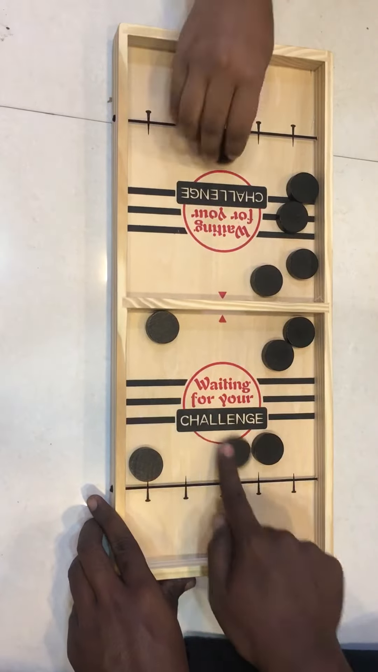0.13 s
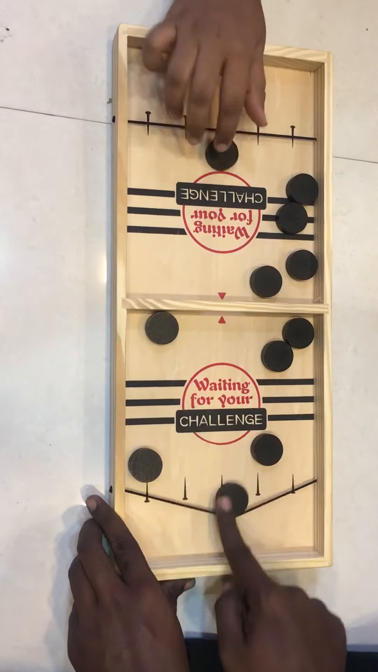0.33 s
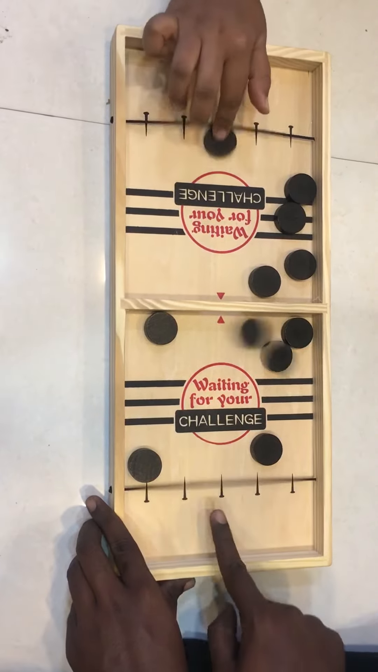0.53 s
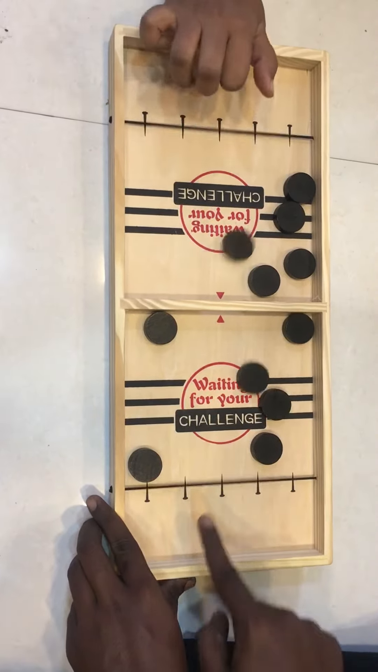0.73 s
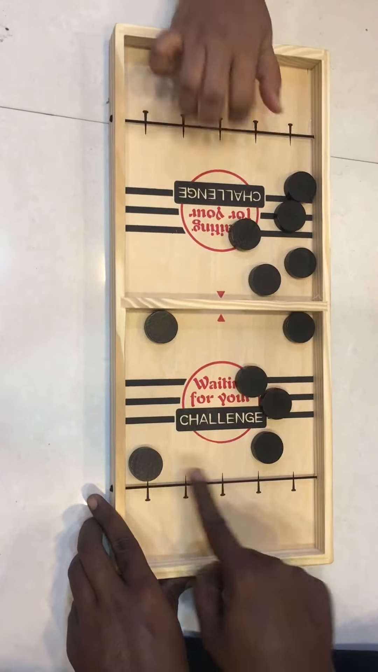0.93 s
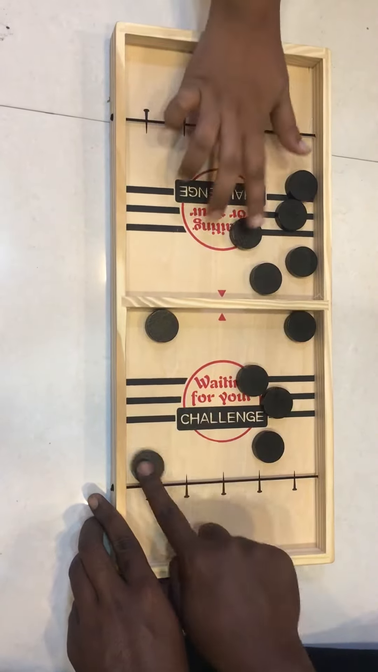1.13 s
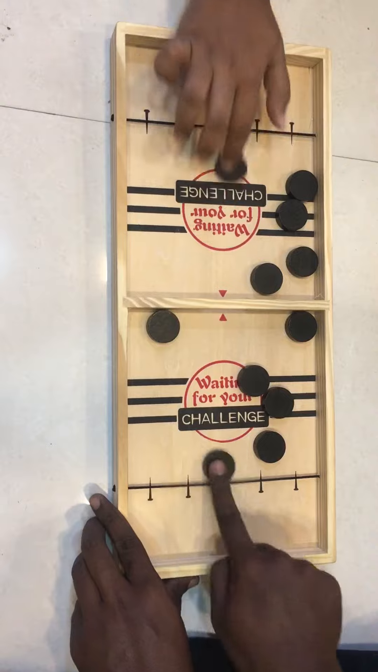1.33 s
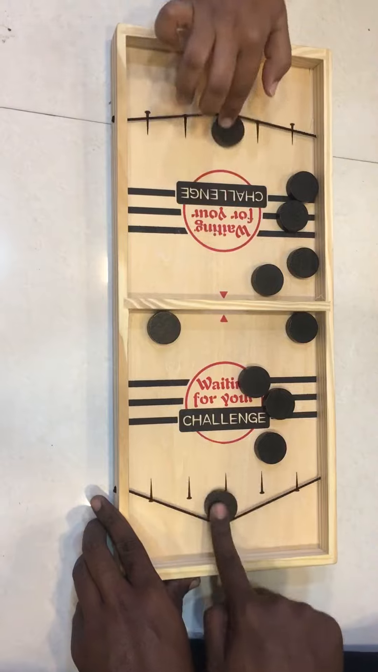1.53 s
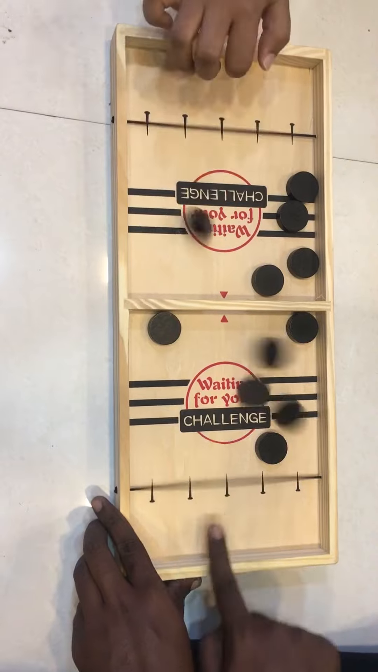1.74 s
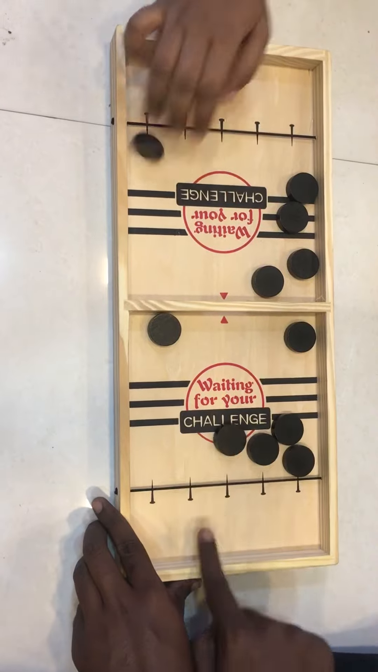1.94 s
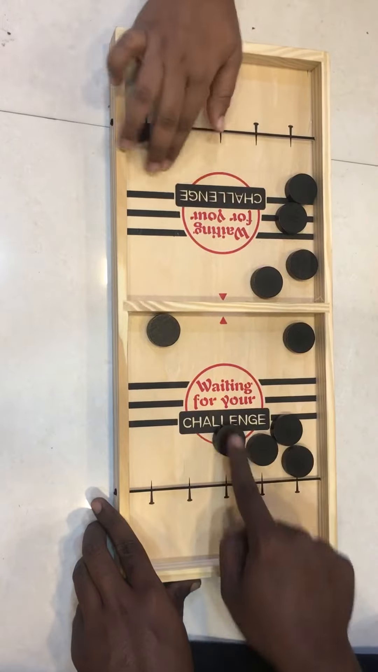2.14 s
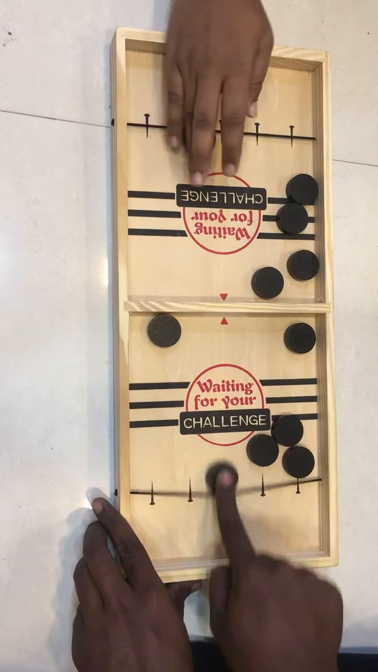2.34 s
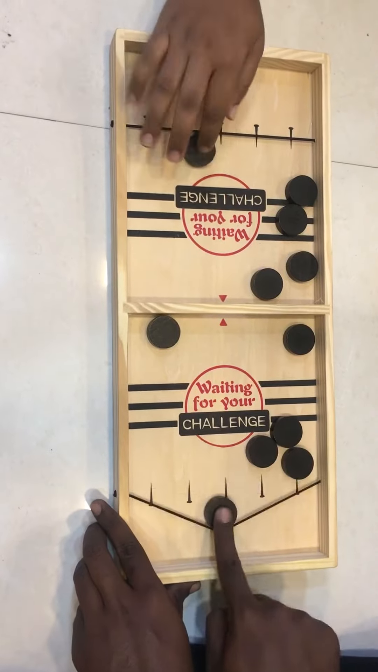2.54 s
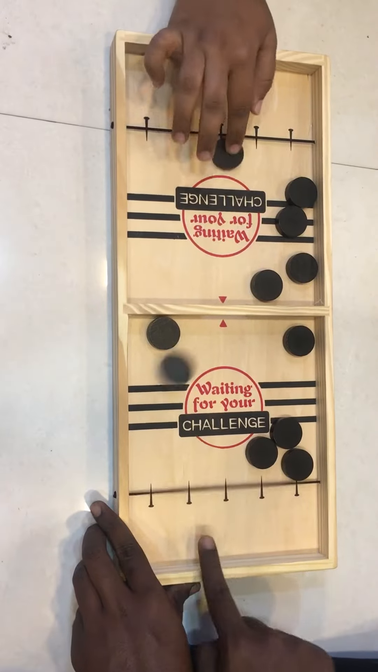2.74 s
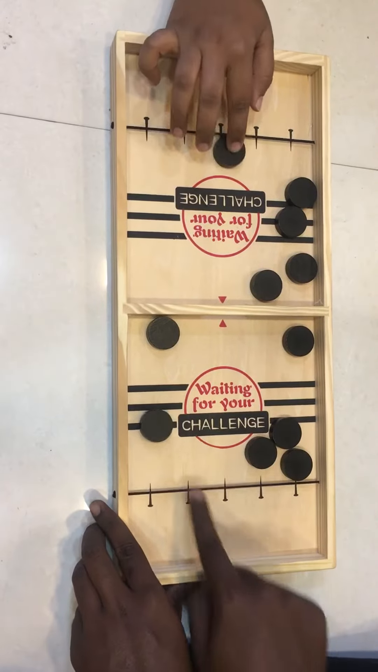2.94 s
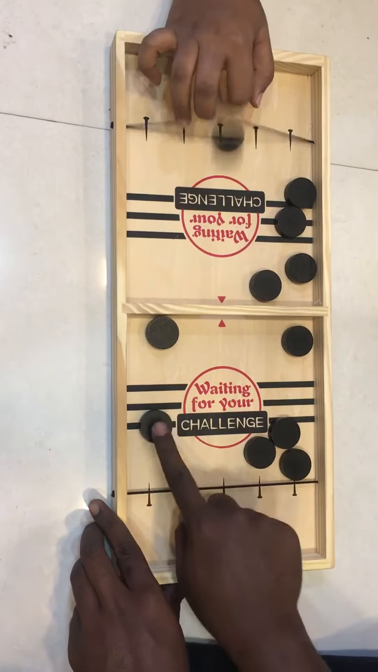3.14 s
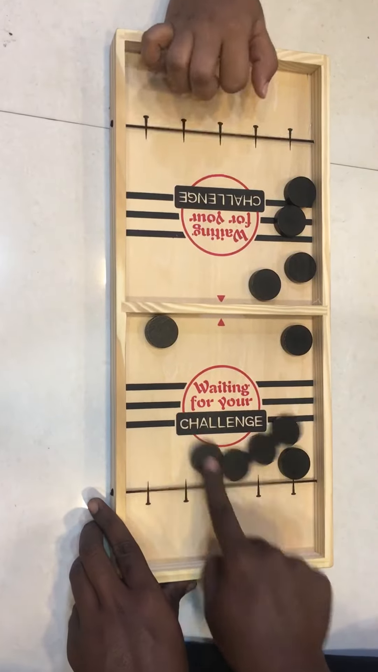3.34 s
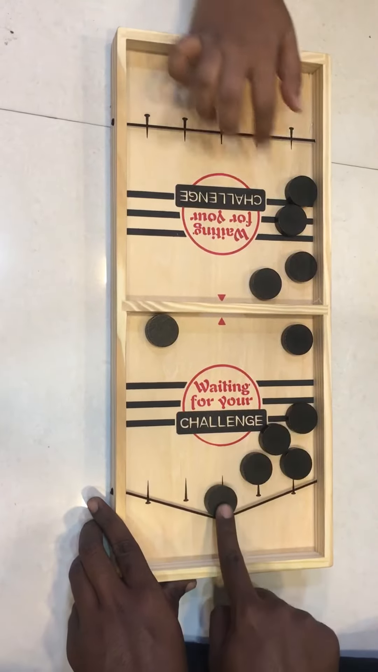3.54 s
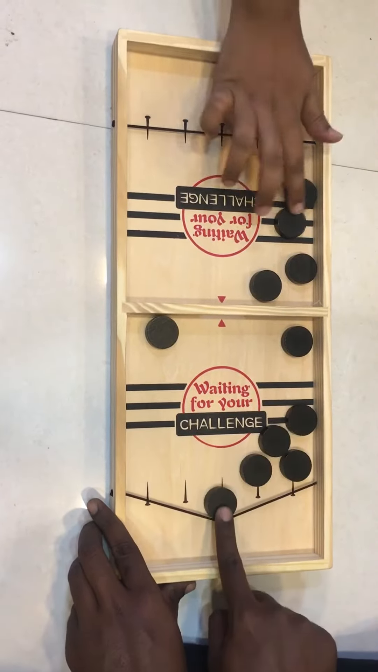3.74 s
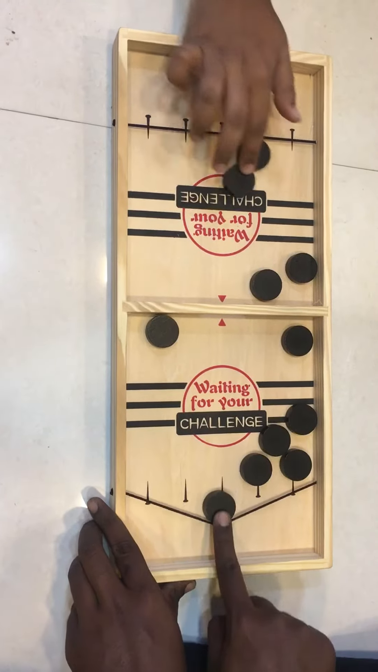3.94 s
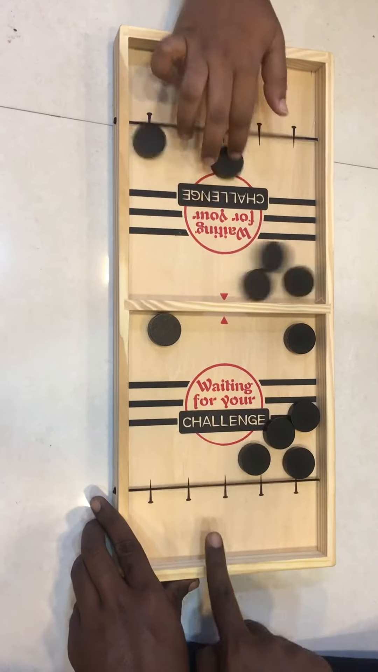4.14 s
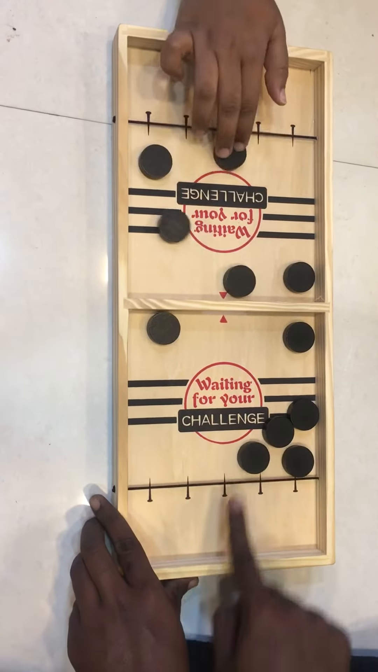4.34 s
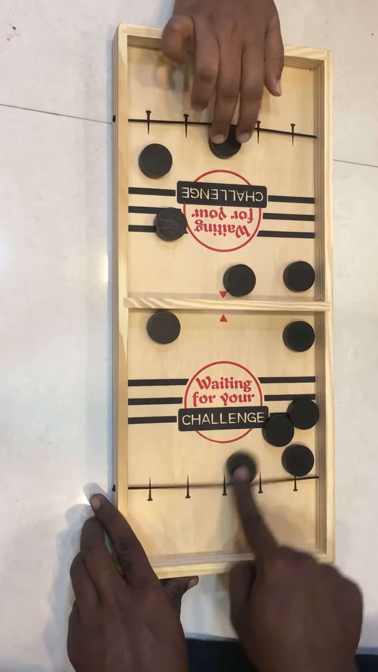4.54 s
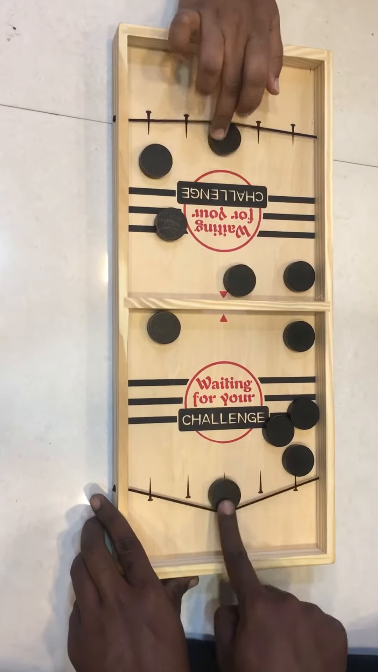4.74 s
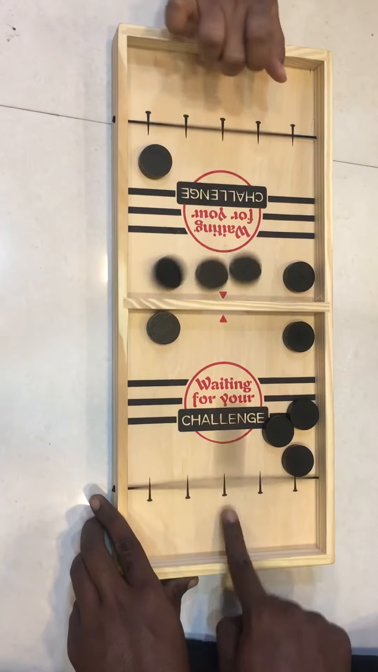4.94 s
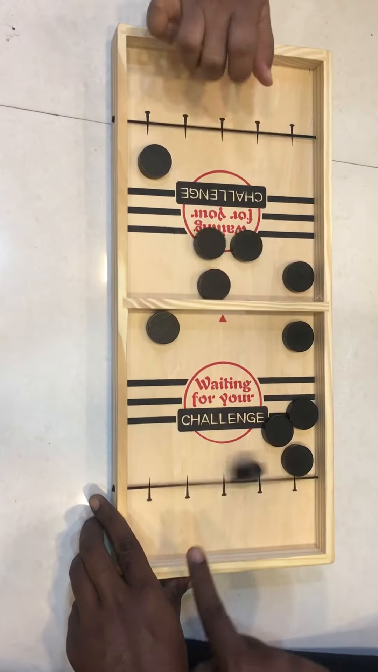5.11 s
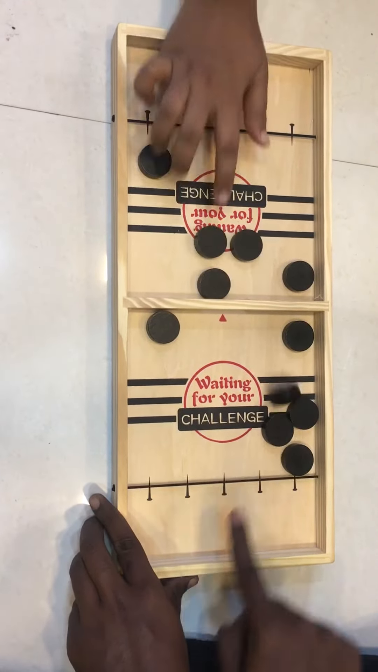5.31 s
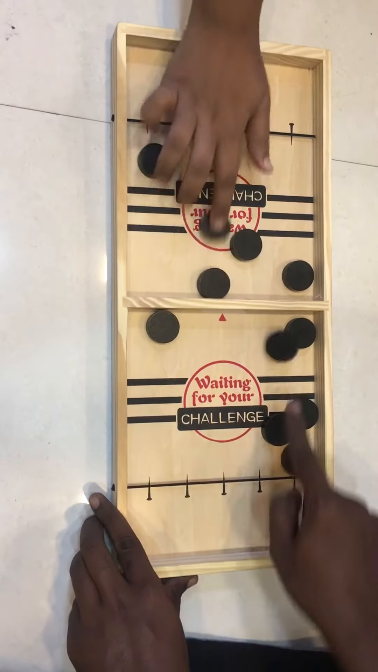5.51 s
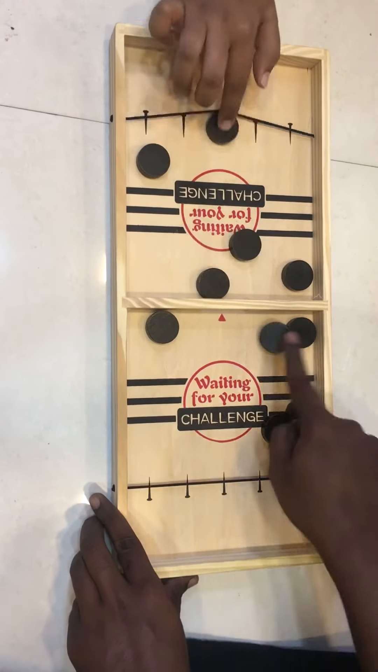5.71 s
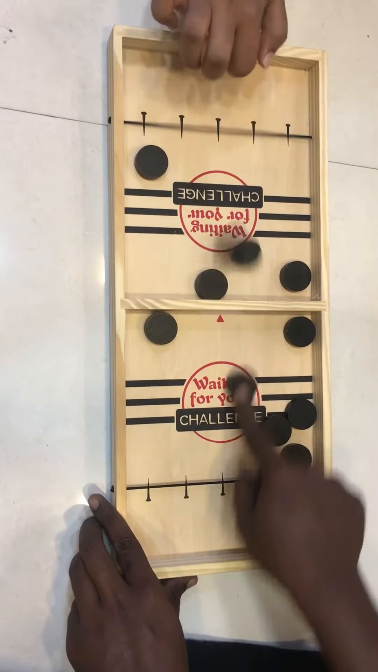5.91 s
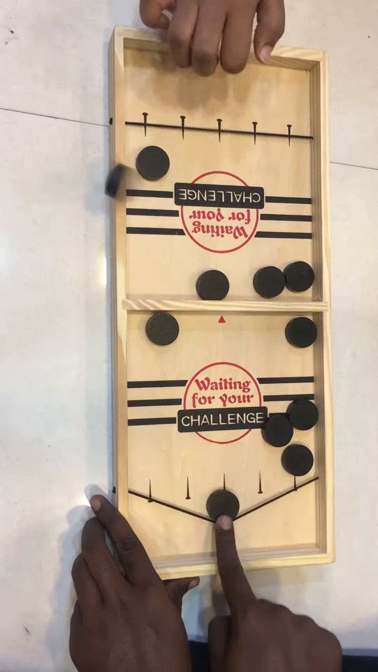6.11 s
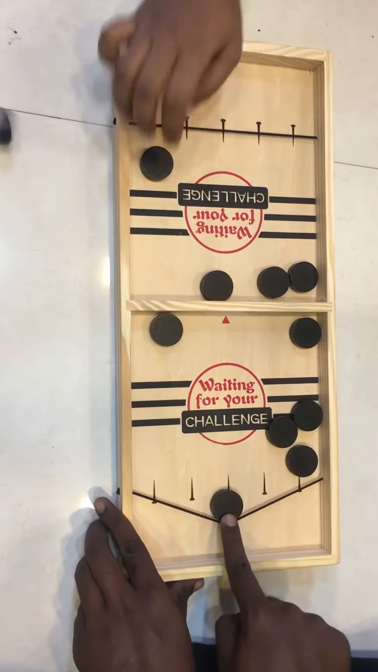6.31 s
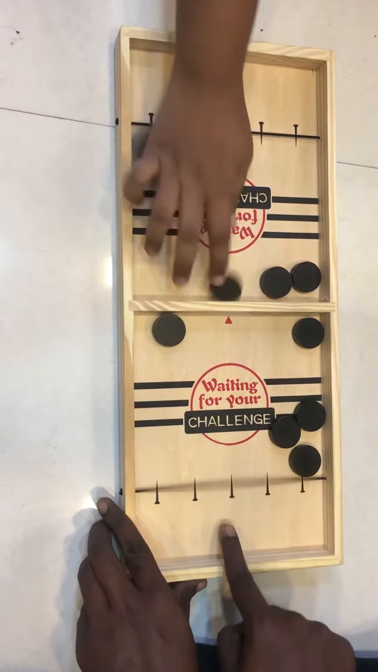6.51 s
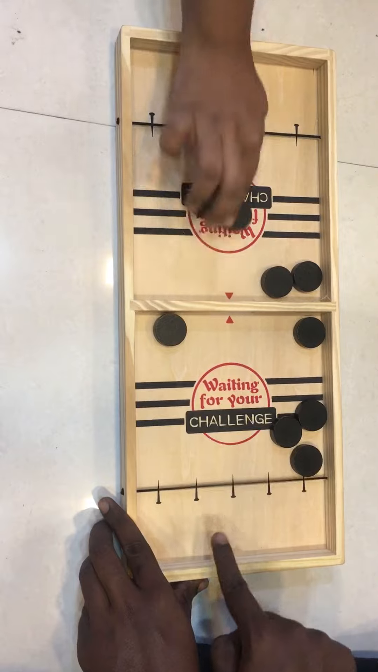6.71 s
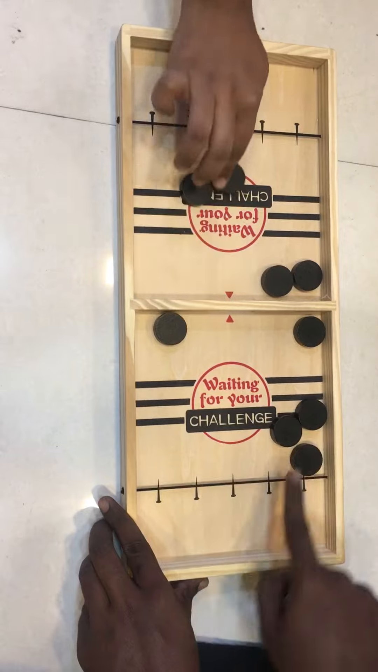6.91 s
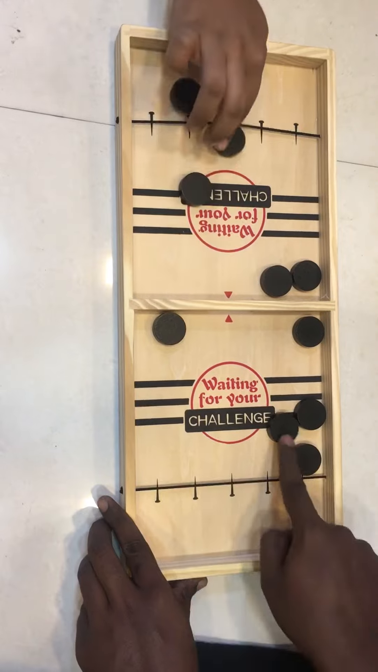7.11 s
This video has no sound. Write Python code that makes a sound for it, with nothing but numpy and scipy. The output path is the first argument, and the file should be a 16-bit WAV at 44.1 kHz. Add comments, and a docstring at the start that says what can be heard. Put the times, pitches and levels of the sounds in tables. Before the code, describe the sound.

Wooden pucks clack and rattle on a wooden game board in quick, irregular bursts over a low hum of distant traffic.

```python
"""At a shallow wooden game board, close up, with a street behind: two players sling wooden pucks.
Pucks knock on the rails and on each other, ringing the board's modes; they rattle flat in quickening
taps and swish over the grain. One jumps off and clicks on the hard floor.
Far traffic hums low, with a faint high squeal now and then."""
import sys
import numpy as np
from scipy import signal
from scipy.fft import rfft, irfft, next_fast_len
from scipy.io import wavfile
from scipy.ndimage import uniform_filter1d

SR = 44100
rng = np.random.default_rng(int(sys.argv[2]) if len(sys.argv) > 2 else 0)


def wav_out(sig):
    """Save sig, one row per channel (or a flat mono array), as 16-bit PCM at SR to the path in sys.argv[1]."""
    wavfile.write(sys.argv[1], SR, np.round(np.clip(np.atleast_2d(sig).T, -1, 1) * 32767).astype(np.int16))


N = 320166


def amp(db):
    """Decibels to gain."""
    return 10 ** (np.asarray(db) / 20)


def unit_rms(x):
    """Scales to rms 1."""
    return x / np.sqrt(np.mean(x ** 2) + 1e-20)


def curve_at(points, hz):
    """Interpolates (f/Hz, value) points over log frequency."""
    f, value = np.transpose(points)
    return np.interp(np.log(hz + 1), np.log(f), value)


def add(mix, start_s, sound):
    """Mixes a sound in at start_s, cut to the mix."""
    at = round(start_s * SR)
    sound = sound[max(-at, 0):]
    part = mix[max(at, 0):][:len(sound)]
    part += sound[:len(part)]


def colour(x, shape, size=2048):
    """Minimum-phase filter of shape (f/Hz, gain/dB)."""
    log_gain = np.log(amp(curve_at(shape, abs(np.fft.fftfreq(size, 1 / SR)))))
    taps = np.fft.ifft(np.exp(np.conj(signal.hilbert(log_gain)))).real
    return signal.fftconvolve(x, taps[:size // 2])[:len(x)]


def noise(shape, count):
    """Noise of rms 1 and shape (f/Hz, density/dB)."""
    gain = amp(curve_at(shape, np.fft.rfftfreq(count, 1 / SR)))
    return unit_rms(irfft(rfft(rng.standard_normal(count)) * gain, count))


def drift(rate_hz, count):
    """Low-passed random motion, rms about 1."""
    size = next_fast_len(count + SR)
    lowpass = np.exp(-(np.fft.rfftfreq(size, 1 / SR) / rate_hz) ** 2)
    return unit_rms(irfft(rfft(rng.standard_normal(size)) * lowpass, size))[:count]


def unit_hit(t, sound, head=400):
    """Scales a hit to rms 1 over its first samples and fades its end."""
    return sound / np.sqrt(np.mean(sound[:head] ** 2)) * (1 - (t / t[-1]) ** 4)


# rumble spectrum: f/Hz, density/dB
RUMBLE_SHAPE = [(15, -24.5), (25, -2.5), (33, -19), (43, -26.5), (60, 5), (75, 4.5), (100, 5), (130, 0.5),
                (150, -6), (185, -7), (240, -23), (400, -70.5)]
# rumble over time: t/s, level/dB
RUMBLE_LEVELS = [(0, -29.5), (1.2, -30), (1.9, -32), (3.3, -29), (3.9, -27), (5.601, -27.5), (6.1, -31.5),
                 (7.26, -29.5)]
# tyre wash spectrum: f/Hz, density/dB
WASH_SHAPE = [(120, -6), (230, -2.5), (300, 3), (420, -2), (620, -2), (800, -4.5), (1050, -3.5), (1400, -9),
              (2000, -15), (3200, -24), (5000, -37), (9000, -46.5), (10800, -60), (16000, -65.5)]
# engine notes: start/s, end/s, first f/Hz, last f/Hz, level/dB
ENGINE_NOTES = [(.85, 1.83, 130, 131.2, -33), (3.652, 4.35, 75.73, 78.5, -26.5),
                (3.852, 4.464, 100.3, 102.9, -23), (4.501, 5.186, 101, 98.2, -27),
                (5.0, 7.592, 115.9, 109.1, -34)]


def traffic(waver_hz=1.6, throb_db=-2.0, wash_db=-43, swell_db=1.73):
    """Far rumble and tyre wash; single engines swell and fade."""
    out = noise(RUMBLE_SHAPE, N) * amp(np.interp(np.arange(N) / SR, *np.transpose(RUMBLE_LEVELS)))
    for start_s, end_s, first_hz, last_hz, level_db in ENGINE_NOTES:
        count = int((end_s - start_s) * SR)
        hz = np.linspace(first_hz, last_hz, count) + waver_hz * drift(7.2, count)
        note = np.sqrt(2) * np.sin(2 * np.pi * np.cumsum(hz) / SR)
        gain = amp(level_db + throb_db * drift(2.6, count))
        add(out, start_s, note * gain * signal.windows.tukey(count, .6))
    return out + noise(WASH_SHAPE, N) * amp(wash_db + swell_db * drift(2.7, N))


# squeal lines: f/Hz, width/Hz, level/dB
SQUEAL_LINES = [(2850, 59, -8), (3290, 59, 3), (3350, 250, -5.5), (3720, 45, -9), (4100, 110, -14),
                (9200, 300, -23.5)]
# squeals: t/s, length/s, level/dB, shift/Hz, glide/(Hz/s)
SQUEAL_SPELLS = [(-.25, 0.72, -48.5, 11, -10.5), (.895, 0.2, -56, -90, 599), (1.08, 0.38, -61.5, 19.5, 4),
                 (6.221, 0.28, -61, -130, -2)]


def squeal(length_s, level_db, shift_hz, glide_hz_per_s, flutter_db=1, rise_s=0.013):
    """Far, fuzzy whistle, like a brake: narrow noise bands, fast attack, slow release."""
    count = int(length_s * SR)
    t = np.arange(count) / SR
    lines = 0
    for hz, width_hz, db in SQUEAL_LINES:
        carrier = np.exp(2j * np.pi * ((hz + shift_hz) * t + glide_hz_per_s * t ** 2 / 2))
        fuzz = drift(width_hz, count) + 1j * drift(width_hz, count)
        lines = lines + amp(db) * (carrier * fuzz).real
    envelope = (1 - np.exp(-t / rise_s)) * (1 - (t / length_s) ** 4)
    return amp(level_db + flutter_db * drift(30, count)) * unit_rms(lines) * envelope


# decay of the surroundings: f/Hz, t60/s
ROOM_DECAY = [(300, 0.43), (1000, 0.26), (3000, 0.23), (7000, 0.16), (14000, 0.14)]


def room(x, wet_db, onset_s=0.0055, size=16384):
    """Adds reflections, new for each source spot; each band dies at its own rate."""
    taps = rng.standard_normal(size) * (1 - np.exp(-np.arange(size) / SR / onset_s))
    hz, t, bands = signal.stft(taps, SR, nperseg=256)
    decay = amp(-60 * t / curve_at(ROOM_DECAY, hz)[:, None])
    tail = signal.istft(bands * decay, SR, nperseg=256)[1]
    response = amp(wet_db) * tail / np.linalg.norm(tail)
    response[0] += 1
    return signal.fftconvolve(x, response)


# floor click spectrum: f/Hz, density/dB
CLICK_SHAPE = [(800, 3), (2400, -1), (3100, -2), (4000, -3), (6000, -10), (9000, -26), (13000, -32),
               (16000, -38)]
# stray puck on the floor: t/s, level/dB, tick/dB
FLOOR_BOUNCES = [(6.2624, -40, 10), (6.329, -41, -28), (6.3898, -34, -4), (6.428, -36, -3), (6.46, -44, 11)]


def bounce(level_db, tick_db, click_t60_s=0.019, ping_hz=3100, ping_db=-3, ping_t60_s=0.022):
    """Puck on the hard floor: thin click and short ping, no board to ring."""
    t = np.arange(SR // 20) / SR
    burst = rng.standard_normal(len(t)) * amp(-60 * t / click_t60_s)
    click = unit_hit(t, colour(burst, CLICK_SHAPE))
    ping = unit_hit(t, np.sin(2 * np.pi * ping_hz * t) * amp(-60 * t / ping_t60_s))
    hit = unit_hit(t, click + amp(ping_db) * ping)
    return amp(level_db) * colour(hit, [(3500, 0), (10000, tick_db)])


# crowded modes of pucks and rails, in slides and knocks: f/Hz, density/dB
CLATTER_SHAPE = [(150, -28.5), (300, -24.5), (500, -11.5), (800, -0.5), (1300, 2.5), (2200, -4), (2900, -5),
                 (3700, -11), (5200, -20), (6800, -25), (9500, -33), (12000, -42.5), (16000, -48.5)]
# gliding pucks: t/s, length/s, level/dB, brightness/dB
PUCK_SLIDES = [(1.155, 0.23, -51.5, 2), (1.596, 0.062, -56.5, 9), (2.545, 0.065, -48, 2),
               (2.688, 0.24, -46.5, -28), (3.138, 0.24, -54.5, 4), (3.717, 0.25, -50, -20),
               (5.489, .15, -46, -7), (5.848, 0.057, -53.5, 12), (6.722, 1, -50, -8)]


def slide(length_s, level_db, bright_db, grain_db=4.5):
    """Wood grain catches a gliding puck in countless tiny slips: a soft swish."""
    count = int(length_s * SR)
    slips = rng.standard_normal(count) * amp(grain_db * drift(60, count))
    wood = colour(slips, CLATTER_SHAPE)
    swish = colour(wood, [(1500, 0), (10000, bright_db), (13000, bright_db + 8.5)])
    return amp(level_db) * unit_rms(swish * signal.windows.tukey(count, .7))


# pucks rattling flat: t/s, length/s, level/dB, hardness/dB
PUCK_WOBBLES = [(0.53, 0.085, -33.5, 1), (1.724, 0.1, -30, -2), (1.804, .09, -36.5, 0),
                (2.644, .04, -28.5, -12), (2.738, 0.19, -40, -14), (4.11, .055, -26, 5),
                (4.892, 0.043, -31.5, -2), (4.999, 0.059, -42, -9), (5.319, 0.051, -38, -19),
                (6.484, 0.064, -28.5, -3)]


def wobble(length_s, level_db, hard_db, first_hz=70, last_hz=130, thud_db=4, fade_db=8, uneven_db=2,
           low_hz=650, high_hz=2200):
    """The rim of a settling puck taps faster and softer, on a new spot each time."""
    out = np.zeros(int(length_s * SR) + SR // 8)
    tap_s = 0
    while tap_s < length_s:
        progress = tap_s / length_s
        tap_db = level_db - fade_db * progress + uneven_db * rng.uniform(-1.1, 1)
        spot_hz = low_hz * (high_hz / low_hz) ** rng.random()
        add(out, tap_s, knock(tap_db, thud_db, hard_db, spot_hz))
        rate_hz = first_hz + (last_hz - first_hz) * progress
        tap_s += rng.uniform(.6, 1.4) / rate_hz
    return out


# board modes: f/Hz, level/dB, t60/s
BOARD_MODES = [(411, -15, 0.059), (609, -5, 0.055), (725, 1.5, 0.05), (833, 2.5, 0.082), (942, -6, 0.06),
               (1058, 2, 0.1), (1184, -1.5, 0.094), (1262, 1, .053), (1503, -2, 0.066), (1656, -3, 0.083),
               (1822, -5, 0.06), (1900, -8, 0.078), (2244, -15, 0.039), (2407, -15, 0.13),
               (2740, -20.5, .044), (2833, -10.5, 0.023), (3140, -7.5, 0.029), (3505, -17.5, 0.035),
               (4040, -14.5, 0.031), (4440, -14, 0.025), (5270, -24.5, 0.018), (6044, -16.5, 0.017),
               (6780, -19, 0.015)]


def board_ring(t, rise_s=0.0017, leak_s=0.0037, kept=0.16):
    """Bending waves fill the board, then mostly leak into the frame and the hands."""
    hz, db, t60_s = np.transpose(BOARD_MODES)[:, :, None]
    modes = amp(db - 60 * t / t60_s) * np.sin(2 * np.pi * (hz * t + rng.random(hz.shape)))
    envelope = (1 - np.exp(-(t / rise_s) ** 2)) * (kept + np.exp(-t / leak_s))
    return unit_hit(t, modes.sum(0) * envelope)


def clatter(t, rise_s=0.00072, t60_s=0.025, chatter_db=-23, chatter_t60_s=0.18):
    """Crowded modes die fast; loose pucks chatter a little longer."""
    decay = amp(-60 * t / t60_s) + amp(chatter_db - 60 * t / chatter_t60_s)
    burst = rng.standard_normal(len(t)) * decay * (1 - np.exp(-t / rise_s))
    return unit_hit(t, colour(burst, CLATTER_SHAPE))


# pucks on rails and each other: t/s, level/dB, thud/dB, hardness/dB, struck spot's f/Hz
PUCK_KNOCKS = [(0.162, -31.5, -6, 0.0, 1580), (0.1752, -33.0, 16, -4.5, 2420),
               (0.467, -39.5, 19, 1, 1400.0), (0.509, -16, -2, 6.5, 1370.0), (0.5594, -22, -8, 3, 2790),
               (0.592, -29, 0, -8, 630.0), (0.606, -29.5, 12.5, -10, 780.0), (0.6621, -24, 0, -4, 1350),
               (1.655, -11.5, 5.5, 0.5, 633), (1.6999, -15.5, -8, 7.0, 1360), (1.7205, -26, 7, 3, 620.0),
               (1.767, -21.5, 0, -4.5, 2790.0), (1.781, -23.5, 12, 8.0, 1350), (1.793, -22.5, -7, 1, 736),
               (1.825, -28.0, 19, 6, 1700), (1.9907, -30.5, 10, 4, 1510), (2.2638, -24.5, 4.5, -3.5, 632),
               (2.2929, -26.0, -9, -5.5, 690.0), (2.511, -30, -6, -17, 4700.0),
               (2.535, -29, 13, -1.0, 2600), (2.6192, -17, -15, 6, 4830), (2.6307, -16, -3, -1, 640),
               (2.816, -30.5, 1.0, 0.5, 2700), (2.908, -36, 9, -17, 3900), (3.2813, -32.5, 8.0, 1, 1370.0),
               (3.3297, -26.5, 17.5, 9, 1054), (3.98, -34, 6, -7, 2200), (4.0399, -27, 17.5, 20.0, 880.0),
               (4.102, -23, -4.5, 10.5, 2170), (4.1483, -26.5, -6, -4, 2250), (4.854, -31.5, 6.0, 4, 865),
               (4.8635, -26, 1, 4.5, 1610), (4.8804, -19, 0, 2.5, 4060.0), (4.9083, -25, -7, -4.5, 610),
               (4.9707, -13, -15.5, 4, 1370.0), (4.9827, -21.5, -14, 3, 1160.0), (5.079, -24, 0, 5.5, 1390),
               (5.254, -23, 10.5, 8, 900.0), (5.2952, -26.0, 12, -8, 870), (5.5066, -30.0, 9, -3, 1030),
               (5.758, -31, -8, -20, 3440.0), (5.7681, -22.5, 11, -0.5, 670.0), (5.898, -25, 0, 0.5, 890),
               (5.91, -23, 7, 2.5, 960), (5.9257, -16, -14, -5.5, 1220), (6.117, -19, 6.5, 4.5, 1030),
               (6.469, -13.5, 12.5, 7.5, 917), (6.5012, -21.5, 0, 9.5, 2080.0),
               (6.5109, -21.0, 2, 11.5, 2400), (6.534, -26, 4, 10, 895), (6.6005, -25.5, -11, -9, 1140),
               (6.662, -26.5, 7.5, 2, 2250), (7.0597, -28.5, -4.0, -15, 3900), (7.129, -30, 4, -11, 630),
               (7.1835, -29.5, -1, -12, 870)]


def knock(level_db, thud_db, hard_db, spot_hz, clatter_db=-4, spot_q=7, spot_gain=1.3,
          echo_cycles=2.5, echo_gain=0.19, crack_share=0.42):
    """One blow: the spot favours one pitch, heavy hits on the frame thud, hard contacts crack and tick."""
    t = np.arange(SR // 8) / SR
    wood = board_ring(t) + amp(clatter_db) * clatter(t)
    wood = wood + spot_gain * signal.lfilter(*signal.iirpeak(spot_hz, spot_q, SR), wood)
    # the rail's echo returns dulled and inverted, in phase at spot_hz
    echo = np.interp(t - echo_cycles / spot_hz, t, wood, left=0)
    wood = unit_hit(t, wood - echo_gain * uniform_filter1d(echo, size=5))
    contact = [(150, -0.5), (350, thud_db), (520, thud_db), (950, -0.42), (1600, 0.6),
               (3000, crack_share * hard_db), (7000, hard_db), (16000, hard_db + 1.0)]
    return amp(level_db) * colour(wood, contact)


def scene(board_wet_db=-12, floor_wet_db=-7):
    """The close game and its reflections over the street, mono."""
    mix = traffic()
    for start_s, *row in PUCK_KNOCKS:
        add(mix, start_s, room(knock(*row), board_wet_db))
    for start_s, *row in PUCK_SLIDES:
        add(mix, start_s, room(slide(*row), board_wet_db))
    for start_s, *row in FLOOR_BOUNCES:
        add(mix, start_s, room(bounce(*row), floor_wet_db))
    for start_s, *row in SQUEAL_SPELLS:
        add(mix, start_s, squeal(*row))
    for start_s, *row in PUCK_WOBBLES:
        add(mix, start_s, room(wobble(*row), board_wet_db))
    return mix[None]


def record(dry):
    """Soft clip, then low-pass."""
    ceiling, edge_hz = 0.9, 15850
    rounded = dry / (1 + (dry / ceiling) ** 6) ** (1 / 6)
    lowpass = signal.firwin(511, edge_hz, window=("kaiser", 9), fs=SR)
    return signal.oaconvolve(rounded, lowpass[None], "same")


dry = scene()
out = record(dry)
wav_out(out)
```